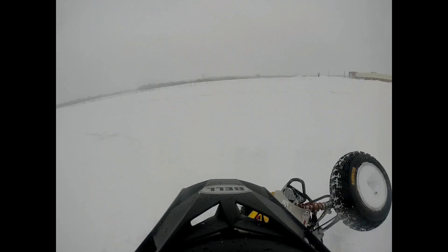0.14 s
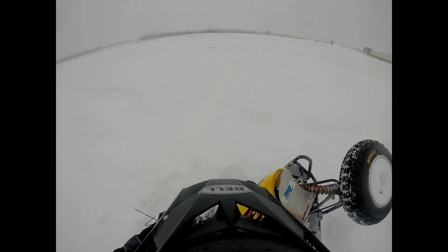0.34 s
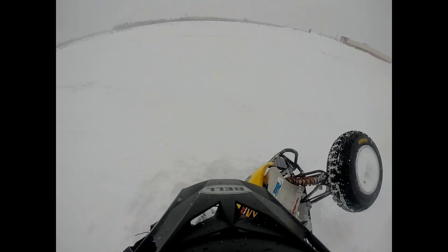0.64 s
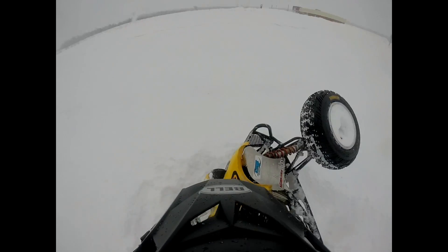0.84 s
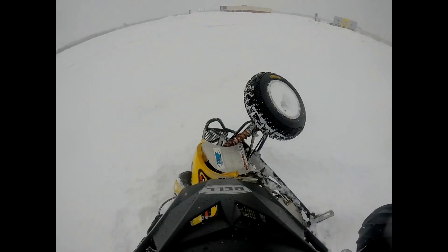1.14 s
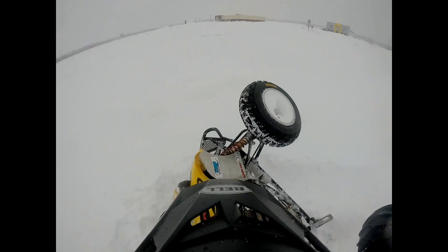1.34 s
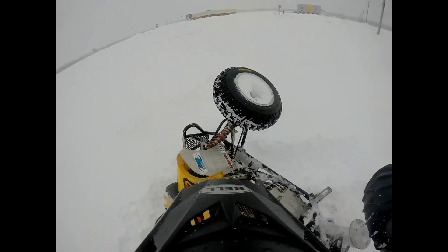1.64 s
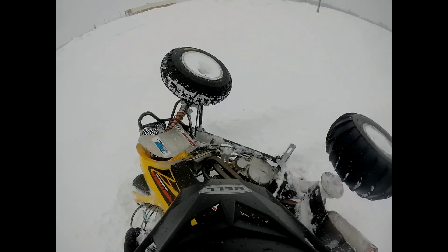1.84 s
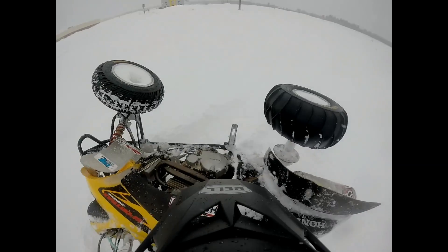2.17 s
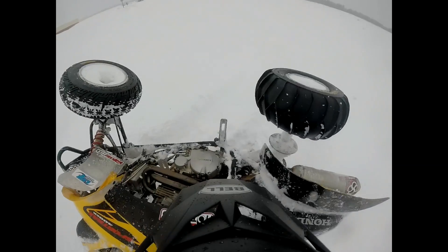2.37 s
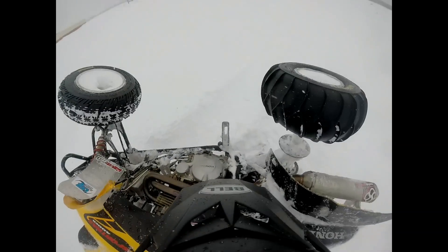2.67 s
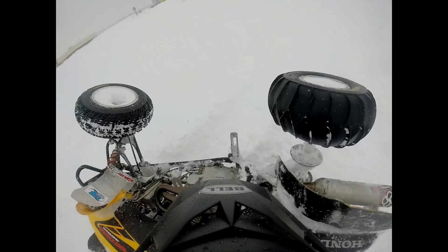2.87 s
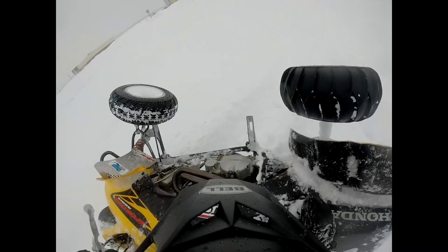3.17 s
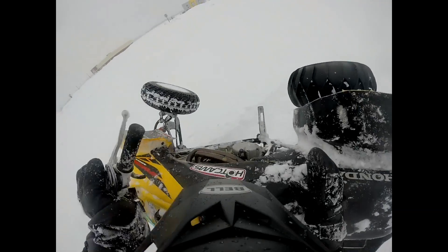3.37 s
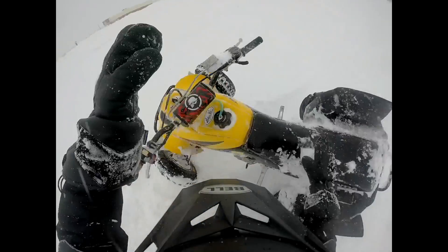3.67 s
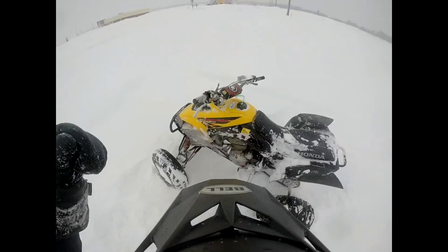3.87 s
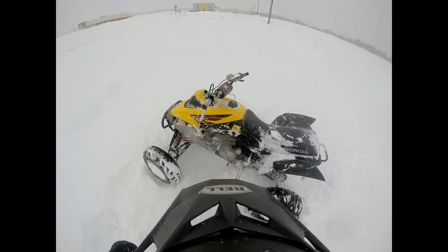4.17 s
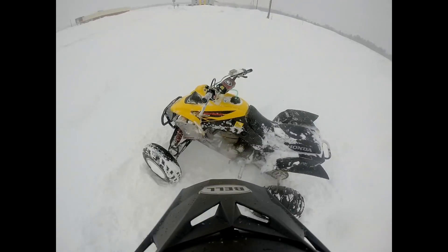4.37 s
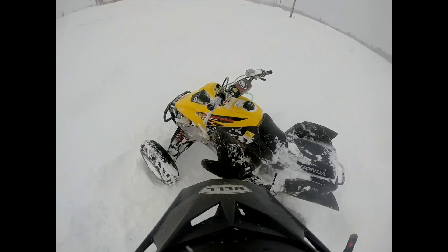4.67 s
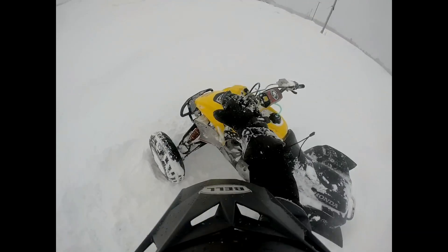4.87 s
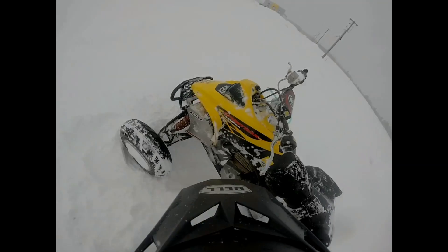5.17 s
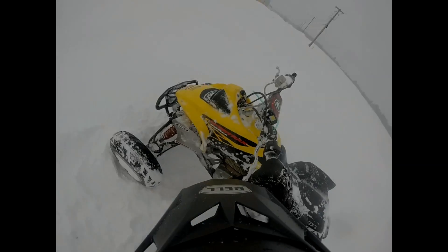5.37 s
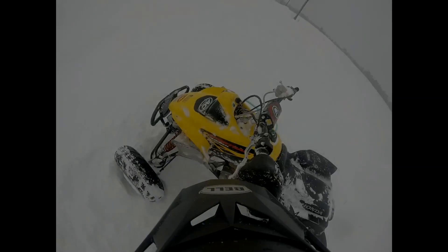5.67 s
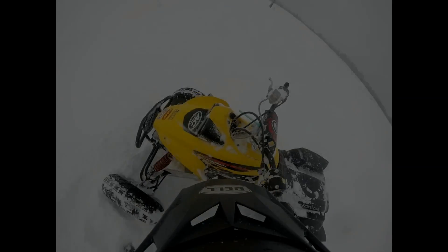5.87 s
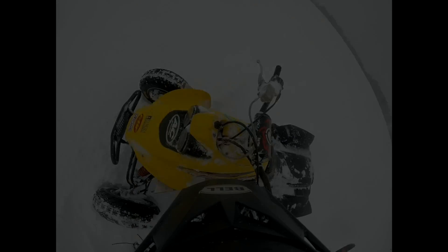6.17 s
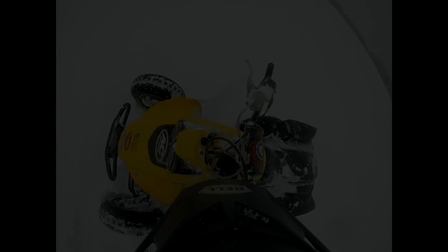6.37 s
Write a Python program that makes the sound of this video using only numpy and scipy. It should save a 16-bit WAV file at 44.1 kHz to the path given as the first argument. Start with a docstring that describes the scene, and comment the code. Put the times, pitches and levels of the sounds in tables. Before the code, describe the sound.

Low wavering wind rumble buffets a helmet-mounted camera while dense sharp cracks, cloth rustle and hollow knocks rattle its plastic case, fading at the end.

```python
"""A small camera in a plastic case sits on a helmet in a windy, snowy field.
Wind sways the mount at a low wavering tone and buffets the port as filtered noise; air hisses past the case.
The strongest sway gust comes at 0.4 s amid dense cracks, noise puffs ringing the case; they thin from 1 to 2 s.
Clothes rustle throughout, as tiny slips through the same modes; decaying sines knock on the shell.
The hardest crack and knock land together at 4.07 s, and the wind drops after 6.2 s over a steady faint hiss."""
import sys
import numpy as np
from scipy.fft import rfft, irfft, next_fast_len
from scipy.io import wavfile
from scipy.ndimage import uniform_filter1d, map_coordinates

SR = 44100
rng = np.random.default_rng(int(sys.argv[2]) if len(sys.argv) > 2 else 0)


def unload_wav(signal):
    """Save mono or channel-first audio to the path in sys.argv[1] as 16-bit WAV at rate SR, clipped to [-1, 1]."""
    wavfile.write(
        sys.argv[1],
        SR,
        np.round(np.clip(np.atleast_2d(signal).T, -1, 1) * 32767).astype(np.int16),
    )


N = 287532  # length in samples

# Pitch of the mount's sway before its flutter: [t/s, f/Hz]
SWAY_PITCH = [(0.0, 51.55), (1.42, 50.53), (1.87, 44.24), (2.56, 53.1), (2.67, 50.6), (3.98, 50.06),
              (4.34, 43.8), (4.68, 50.7), (5.39, 49.6), (5.56, 52.1), (6.37, 50), (6.52, 53.3)]
# Wind between gusts: [t/s, sway level/dB, push level/dB, buffet level/dB before BUFFET_LIFT_DB]
WIND = [(0, -48, -45, -60.5), (0.4, -48, -59, -59.5), (1.0, -55, -49, -60.5), (1.8, -46.5, -53, -61),
        (2.4, -56, -56, -57.5), (3.0, -54.5, -53, -60.5), (3.45, -47, -49.5, -59.5),
        (4.0, -51.5, -43.5, -55.5), (4.3, -56.5, -70, -59), (4.7, -44, -56, -54), (5.16, -49.5, -47, -56.5),
        (5.36, -48.5, -52, -58.5), (5.8, -45, -69, -54), (6.1, -52.5, -62, -61.5), (6.3, -67, -72, -68.5),
        (6.52, -61.5, -69, -70.5)]
# Gusts that jolt the mount and push on the port:
# [peak t/s, length/s, sway level/dB, push level/dB, buffet level/dB before BUFFET_LIFT_DB]
GUSTS = [(0.166, 0.29, -50, -51, -63.5), (0.377, 0.17, -29.5, -32.5, -61), (0.882, 0.35, -48.5, -45, -70),
         (1.116, 0.1, -36.5, -38.5, -61.5), (1.222, 0.17, -44, -62, -78), (1.436, 0.12, -43, -53, -70),
         (2.074, 0.15, -37, -43.5, -59.5), (2.396, 0.19, -42.5, -44.5, -68), (2.543, 0.07, -46, -43, -59),
         (2.649, 0.1, -41, -51.5, -64), (3.023, 0.15, -37.5, -54, -56), (3.293, 0.084, -47.5, -49.5, -75),
         (3.486, 0.061, -42.5, -45, -72), (3.836, 0.19, -34, -53, -67), (4.059, 0.12, -40.5, -57, -58),
         (4.216, 0.07, -42, -49, -80), (4.355, 0.045, -37.5, -50, -62), (4.688, 0.063, -32.5, -44, -69),
         (4.905, 0.097, -35.5, -60, -57), (5.178, 0.2, -41, -41.5, -53.5), (5.549, 0.12, -37.5, -61, -70),
         (5.679, 0.15, -46.5, -62, -57), (6.002, 0.085, -45, -55, -63)]


def mount():
    """The mount sways at one wavering tone, slightly rough, driven by wind and gusts."""
    base_hz, = curves(SWAY_PITCH)
    sway_db = curves(WIND)[0] + 5.7 * wobble(7.8)
    size = np.hypot(swells(GUSTS, column=2), amp(sway_db))
    roughness = amp(2.1 * wobble(25))
    hz = base_hz + 1.43 * wobble(18)
    tone = np.sin(2 * np.pi * np.cumsum(hz) / SR)
    return np.sqrt(2) * size * roughness * tone


# Colour of the slow push on the port: [f/Hz, relative level/dB per Hz]
PUSH_COLOUR = [(8, -32), (18, 0.5), (26, 7), (38, -14), (65, -8.5), (90, -34)]
# Colour of the buffeting: [f/Hz, relative level/dB per Hz]
BUFFET_COLOUR = [(40, -35), (70, 6), (125, -3), (148, 1.5), (170, -5), (300, -10), (550, -16), (775, -17.5),
                 (900, -22), (1040, -16), (1250, -20), (1800, -10.5)]
PUSH_LAG_S, BUFFET_LIFT_DB = 0.014, 5.0  # push gusts follow the sway; gain on all buffeting


def wind():
    """Eddies press on the port in lumps: a slow push and a brighter buffeting."""
    _, push_db, buffet_db = curves(WIND)
    push_size = np.hypot(swells(GUSTS, column=3, lag_s=PUSH_LAG_S), amp(push_db))
    push = push_size * unit(amp(3.7 * wobble(37)) * noise(PUSH_COLOUR))
    buffet_size = np.hypot(swells(GUSTS, column=4), amp(buffet_db)) * amp(BUFFET_LIFT_DB)
    lumps = amp(1.5 * wobble(13) + 1.5 * wobble(40))
    return push + buffet_size * unit(lumps * noise(BUFFET_COLOUR))


# Clear cracks: [t/s, middle-mode peak level/dB, low level/dB re middle, high level/dB re middle]
CRACKS = [(0.0312, -48, -1, 7), (0.0353, -18, 1, -6.5), (0.046, -40, -1, -5), (0.0835, -30.5, 0, -8),
          (0.1203, -24.5, -12, -5), (0.1397, -24.5, -6.5, -5), (0.1765, -25, -8, 0), (0.2468, -30, -3, -1),
          (0.2551, -23, -13, -4.5), (0.3137, -43, -1, 10), (0.3571, -48.5, 8, 4), (0.386, -55, 19.5, 6),
          (0.4185, -33.5, 6.5, 3), (0.4296, -38, -4, 0), (0.4447, -44, 2.5, 3), (0.4647, -45.5, 14.5, -1),
          (0.4981, -32, -3.5, -3), (0.5532, -50, -1, 4), (0.611, -33.5, -7, -15), (0.6144, -37, -11, -3),
          (0.622, -50, 18, -9), (0.6776, -37.5, -22, 2.5), (0.7075, -34, -10, -13),
          (0.7339, -32.5, -3, -4.5), (0.787, -33, -3, -6.5), (0.9004, -30, 6.5, -11), (0.9045, -41, -2, -3),
          (0.9302, -46, 10, -5), (0.9357, -31, 13.5, 7.5), (0.9477, -25, -2, -9), (1.2358, -25, -4, -12),
          (1.2634, -32.5, -8, 2), (1.499, -34, -4, -5), (1.6468, -40.5, 6, 2), (1.6652, -30, -18, -11),
          (1.7272, -46, 12.5, 2), (1.7518, -41, 12, 1), (1.7943, -37, -0.5, -1), (1.8167, -37.5, -3, -1),
          (2.0022, -42.5, -2, 5), (2.0315, -30, -13, -15), (2.0623, -33, -9, -5), (2.0963, -27, -14, 3.5),
          (2.3503, -30, -6, -27), (2.3698, -46, 14, -10), (2.3743, -36.5, -9, -6), (2.4501, -35, 5.5, -2),
          (2.4617, -32.5, -2, 1), (2.4773, -30.5, -3, 0), (2.5633, -30.5, -4.5, -2), (2.5963, -17, -18, -9),
          (2.6055, -39, 8.5, -3), (2.6611, -46.5, 9, 17.5), (2.6934, -34, 5, -4), (2.7776, -30.5, -6, 1.5),
          (2.7893, -32.5, -10, 0.5), (2.7955, -32, -11, -1), (2.9138, -31, -15, 3.5),
          (2.9527, -15.5, -9, -1), (2.9599, -15.5, -17, -2), (3.0297, -16.5, -12, -4),
          (3.0613, -34.5, 5.5, 0.5), (3.1153, -20, -25, -6.5), (3.1238, -41, -1, 4), (3.1592, -49, 0, 6),
          (3.1926, -31, -7, -3), (3.2193, -32.5, -4, -3), (3.3487, -43.5, 9, -1.5), (3.3527, -44.5, 2, 8),
          (3.3764, -54, 21.5, -4), (3.3998, -50, -3, 8), (3.556, -47, 6, -5), (3.5605, -18, -32, -6),
          (3.602, -29, -21, -8.5), (3.7985, -35.5, 3, -0.5), (3.8021, -25, -13, -2), (3.8154, -41, -18, -4),
          (3.8485, -30, -10, -6), (3.908, -37, -1, 1), (3.919, -17.5, -2.5, -3), (3.9634, -40.5, -14, 1.5),
          (4.0723, -8, -15, -1.5), (4.5109, -42, 8, 1), (4.568, -39.5, -17, 0), (4.5784, -25.5, -4.5, -3),
          (4.5957, -27.5, 1.5, -2), (4.6097, -33, -11, -6), (4.635, -33.5, -8, -1), (4.6586, -35, -17, -1),
          (4.7427, -31.5, -2, -5), (4.7699, -39, 4, 1), (4.8055, -42.5, 8, 10), (4.828, -46, 2, 5),
          (4.8496, -45.5, 17, -6), (4.869, -47, -2, 4), (5.2585, -16, 1, -1.5), (5.2873, -51, 4, -9),
          (5.322, -22, -15, -8), (5.3643, -27.5, -8, 1), (5.4685, -37.5, 2, 9.5), (5.5325, -51, -6, 7),
          (5.5494, -31, -23, -7), (5.6464, -35.5, 3.5, 7), (5.8063, -43, -11, 1), (5.893, -46, -6, 4),
          (5.912, -24, -29, -7), (6.0217, -24, -15, -7.5), (6.0612, -27.5, -17, -6), (6.0667, -40, -9, 0),
          (6.0753, -43, -8, 4), (6.15, -48, -2, 2), (6.2515, -51.5, -8, 6.5), (6.4286, -38.5, -16, -8),
          (6.5018, -45, -20, 3.5)]
# Resonances of case and shell, low, middle and high: each [f/Hz, width/Hz, level/dB]
LOW_MODES = [(1518, 193, -3), (1840, 476, -1), (2555, 776, 1)]
MID_MODES = [(3760, 890, 5.5), (4360, 500, 9), (5736, 1090, 7), (6236, 940, 5)]
HIGH_MODES = [(6500, 520, -0.5), (8840, 2040, -1), (10780, 2900, -1.5), (11950, 1360, -1),
              (14670, 1600, -11)]


def ticks():
    """Each crack is a puff of force into the modes of the case; high modes get the shortest force."""
    s, mid_db, low_db, high_db = np.transpose(np.vstack([CRACKS, creaks(count=170)]))
    low = bursts(s, mid_db + low_db, t60=0.0097, modes=LOW_MODES)
    mid = bursts(s, mid_db, t60=0.0048, modes=MID_MODES)
    high = bursts(s, mid_db + high_db, t60=0.0039, modes=HIGH_MODES)
    return low + mid + high


# Cloth between scrapes, before stirring: [t/s, low level/dB, middle level/dB, high level/dB]
CLOTH = [(0, -58, -66, -77), (0.4, -64, -67, -75), (0.95, -65.5, -66, -76), (1.3, -57.5, -64, -68),
         (1.9, -64, -63, -71), (2.4, -55.5, -61, -72), (3.1, -55.5, -62.5, -69), (3.3, -64, -64, -77),
         (3.7, -57, -63, -64), (4.3, -58.5, -60, -71), (4.7, -62.5, -61, -65), (5.0, -58, -58.5, -63.5),
         (5.45, -58, -63.5, -72.5), (6.0, -59.5, -64.5, -84), (6.25, -61.5, -65.5, -75),
         (6.52, -66, -68.5, -77.5)]
CREAK_NEAR_S = 0.046  # time scatter around a crack
CREAK_DB, CREAK_SPREAD_DB = 10.5, 2.5  # gain over the cloth, size scatter
CREAK_LOW_DB, CREAK_HIGH_DB, CREAK_COLOUR_DB = 4.5, -3, 7.5  # balance re middle modes, its scatter


def creaks(count):
    """Small ticks crowd around the cracks and are louder when the cloth is; rows as in CRACKS."""
    draw, shade = rng.random((count, 2)), rng.standard_normal((count, 3))
    crack = (draw[:, 0] * len(CRACKS)).astype(int)
    near = np.array(CRACKS)[crack, 0]
    s = np.clip(near + CREAK_NEAR_S * shade[:, 0], 0, N / SR)
    low_db = CREAK_COLOUR_DB * shade[:, 1]
    high_db = CREAK_COLOUR_DB / 2 * shade[:, 2]
    cloth_db = np.interp(s, *np.transpose(CLOTH)[[0, 2]])  # its middle band
    size_db = CREAK_DB - CREAK_SPREAD_DB * np.log(draw[:, 1] + 0.017)  # a few stand out
    mid_db = cloth_db + size_db - low_db / 2
    return np.transpose([s, mid_db, CREAK_LOW_DB + low_db, CREAK_HIGH_DB + high_db])


# Hollow knocks and thumps on the shell: [t/s, start level/dB before the soft attack, tone name]
KNOCKS = [(.0358, -43, "dull"), (.176, -35.5, "dull"), (.2872, -39, "clack"), (.315, -42, "dull"),
          (.936, -45, "dull"), (1.795, -40.5, "ring"), (2.953, -28, "deep"), (3.349, -46, "hollow"),
          (3.799, -48, "hollow"), (3.919, -31.5, "dull"), (4.0723, -16, "deep"), (4.083, -43.5, "thump"),
          (4.2175, -41, "clack"), (4.2961, -41, "click"), (4.7591, -34.5, "clack"), (5.2589, -30, "dull"),
          (5.2869, -31, "clack"), (5.367, -35, "hollow"), (5.43, -45, "ring"), (5.4844, -34, "click"),
          (5.5023, -37.5, "clack"), (5.7386, -43, "clack")]
# Tones of the shell, by name: [f/Hz, t60/s]
TONES = {"thump": (142.7, 0.36), "deep": (580, 0.004), "hollow": (785, 0.06), "dull": (994, 0.01),
         "ring": (1030, 0.022), "clack": (1560, 0.017), "click": (1700, 0.014)}


def knocks():
    """A few blows also wake a hollow tone of the shell, a sine that dies at its own rate."""
    out, t = np.zeros(N + SR), np.arange(SR // 4) / SR
    attack = 1 - np.exp(-t / 0.00012)
    for s, db, tone in KNOCKS:
        hz, t60 = TONES[tone]
        decay = amp(db - 60 * t / t60)
        out[round(s * SR):][:len(t)] -= decay * np.sin(2 * np.pi * hz * t) * attack
    return out[:N]


# Strokes of cloth over the shell:
# [peak t/s, length/s, low level/dB, middle level/dB, high level/dB, hollow level/dB]
SCRAPES = [(0.16, 0.1, -53, -68, -68, -65), (0.26, 0.18, -49, -61, -69, -58),
           (0.72, 0.16, -54.5, -66, -70, -66), (0.88, 0.068, -50.5, -71, -75, -71),
           (1.68, 0.064, -60, -62, -66, -72), (2.06, 0.18, -57, -63, -76, -87),
           (2.46, 0.25, -52, -66, -69, -81), (2.78, 0.033, -57, -64, -69, -73),
           (3.0, 0.15, -52.5, -61, -69, -69.5), (3.14, 0.23, -54.5, -61, -69, -73),
           (3.8, 0.18, -63, -59, -76, -70), (4.0, 0.069, -49.5, -51.5, -74, -66.5),
           (4.14, 0.14, -53.5, -50.5, -56, -70), (4.3, 0.21, -69.5, -63, -68, -78),
           (4.43, 0.12, -52, -57.5, -69, -79), (4.82, 0.18, -51, -56.5, -87, -72),
           (5.16, 0.23, -55, -58, -72, -85), (5.35, 0.1, -55, -60, -66, -71),
           (5.72, 0.28, -53, -51.5, -67, -86), (5.88, 0.22, -56.5, -62, -79, -76)]
# The shell's hollow resonances under rubbing: [f/Hz, width/Hz, level/dB]
HOLLOW_MODES = [(775, 41, -6.5), (1044, 84, -3)]
STIR_LOW_DB, STIR_MID_DB, STIR_HIGH_DB = -0.5, 1.5, 2  # cloth gain per nearby crack
EVEN_SCRAPE = 0.71  # amplitude of even noise added to the slips in a scrape's treble


def rustle():
    """Cloth rubs the shell in tiny slips and sounds through the same modes as the cracks."""
    low_db, mid_db, high_db = curves(CLOTH)
    coarse = grains(count=900, spread_db=4.5, smooth=0.79, t60=0.016)
    fine = grains(count=1200, spread_db=3.0, smooth=0.27, t60=0.03)
    low = rung(coarse, LOW_MODES, edge_hz=1200)
    low += amp(-12.5) * rung(coarse, HOLLOW_MODES, edge_hz=4400)
    weave = 0.72 * rng.standard_normal(N)  # the middle modes also carry the even hiss of the weave
    mid = rung(fine + weave, MID_MODES, edge_hz=13000)
    high = rung(fine, HIGH_MODES, edge_hz=17000)
    move = stir()
    low *= np.hypot(swells(SCRAPES, column=2), amp(low_db + STIR_LOW_DB * move))
    mid *= np.hypot(swells(SCRAPES, column=3), amp(mid_db + STIR_MID_DB * move))
    high *= amp(high_db + STIR_HIGH_DB * move)
    scrape_force = fine + EVEN_SCRAPE * rng.standard_normal(N)
    high += swells(SCRAPES, column=4) * rung(scrape_force, HIGH_MODES, edge_hz=11000)
    hollow = swells(SCRAPES, column=5) * rung(coarse, HOLLOW_MODES, edge_hz=3300)
    return low + mid + high + hollow


def grains(count, spread_db, smooth, t60):
    """Force of rubbing cloth: many tiny slips of uneven size over a smooth scrape."""
    draw = rng.random((count, 2))
    size_db = -spread_db * np.log(draw[:, 1] + 0.0057)
    slips = bursts(draw[:, 0] * N / SR, size_db, t60)
    return unit(slips) + smooth * rng.standard_normal(N) * amp(2.67 * wobble(30))


def stir():
    """Cracks near each moment, about their mean: the movement that cracks the shell also drags the cloth."""
    t = np.arange(0, N, 64) / SR
    reach_s = 0.035
    close = np.exp(-((t - np.array(CRACKS)[:, :1]) / reach_s) ** 2 / 2).sum(axis=0)
    return np.interp(np.arange(N) / SR, t, close - close.mean())


WHISTLE_DB, WHISTLE_GROWS = -74.5, 1.1  # level at a WIND buffet of -51 dB, dB per dB of buffet


def air():
    """Air hisses evenly past the case, in its high modes, when the wind between gusts is up."""
    buffet_db = curves(WIND)[2]
    level_db = WHISTLE_DB + WHISTLE_GROWS * (buffet_db + 51) + 2.2 * wobble(8)
    return amp(level_db) * rung(rng.standard_normal(N), HIGH_MODES, edge_hz=8800)


# Colour of the steady hiss: [f/Hz, relative level/dB per Hz]
HISS_COLOUR = [(200, -14.5), (500, 23), (1200, 12), (3000, 1), (8000, -10), (15000, -20), (16000, -40)]


def hiss():
    """A steady faint hiss of coloured noise lies under everything."""
    return amp(-73.5) * noise(HISS_COLOUR)


def swells(rows, column, lag_s=0):
    """Gain of all rows together: powers add, each rising to its peak and falling again by one rule."""
    edge_db, shape = 5.5, 1.73  # fall at the ends of the length; 1 is pointed, 2 is round
    t, rows = np.arange(0, N, 64) / SR, np.array(rows)
    away = np.abs(t - lag_s - rows[:, :1]) / (rows[:, 1:2] / 2)
    power = amp(2 * (rows[:, column, None] - edge_db * away ** shape)).sum(axis=0)
    return np.interp(np.arange(N) / SR, t, np.sqrt(power))


def bursts(times, db, t60, modes=None):
    """Short dying puffs of noise peaking at db: the force of a slip or, through modes, the sound of a crack."""
    k = np.arange(512)
    puffs = rng.standard_normal((len(times), len(k))) * amp(-60 * k / SR / t60)
    if modes:
        puffs = irfft(rfft(puffs) * resonances(np.fft.rfftfreq(len(k), 1 / SR), modes))
    power = np.abs(uniform_filter1d(puffs ** 2, size=30, axis=1))
    peak = np.sqrt(2 * power.max(axis=1))  # as a sine of the same short-time power
    puffs = puffs * (amp(db) / peak)[:, None]
    at = np.round(times * SR).astype(int)[:, None] + k
    return np.bincount(at.ravel(), puffs.ravel(), N + 2 * len(k))[:N]


def resonances(f, modes):
    """Complex response of a set of modes, with alternating signs."""
    total = 0
    for k, (hz, width, db) in enumerate(modes):
        total = total + (-1) ** k * amp(db) * 1j * f * width / (hz * hz - f * f + 1j * f * width)
    return total


def rung(x, modes, edge_hz):
    """Rubbing force, weak above edge_hz, through the modes, at rms 1."""
    return unit(filtered(x, lambda f: resonances(f, modes) / (1 + 1j * f / edge_hz)))


def noise(spectrum):
    """Noise of rms 1 coloured by (Hz, dB) points on a log axis."""
    f, db = np.transpose(spectrum)
    gain = lambda hz: amp(np.interp(np.log(hz + 1), np.log(f), db, left=-120, right=-120))
    return unit(filtered(rng.standard_normal(N), gain))


def filtered(x, response):
    """x times a complex response of frequency."""
    m = next_fast_len(N + SR // 2)
    return irfft(rfft(x, m) * response(np.fft.rfftfreq(m, 1 / SR)), m)[:N]


def wobble(rate):
    """A smooth random curve, rate knots a second."""
    knots = rng.standard_normal(int(N * rate / SR) + 4)
    return map_coordinates(knots, [np.arange(N) * rate / SR])


def curves(rows):
    """One value per sample for each column after the time."""
    s, *cols = np.transpose(rows)
    return [np.interp(np.arange(N) / SR, s, c) for c in cols]


def amp(db):
    """Amplitude of a level in dB."""
    return 10 ** (np.asarray(db) / 20)


def unit(x):
    """x scaled to rms 1."""
    return x / np.sqrt(np.mean(x ** 2) + 1e-20)


def scene():
    """All layers summed into one channel."""
    return (mount() + wind() + ticks() + knocks() + rustle() + air() + hiss())[None]


TOP_HZ = 16660  # band limit


def record(dry):
    """The case dulls the treble steeply around 15.2 kHz; nothing is kept above the band limit."""
    return filtered(dry[0], lambda hz: (hz < TOP_HZ) / (1 + (hz / 15200) ** 24))[None]


dry = scene()
out = record(dry)
unload_wav(out)
```